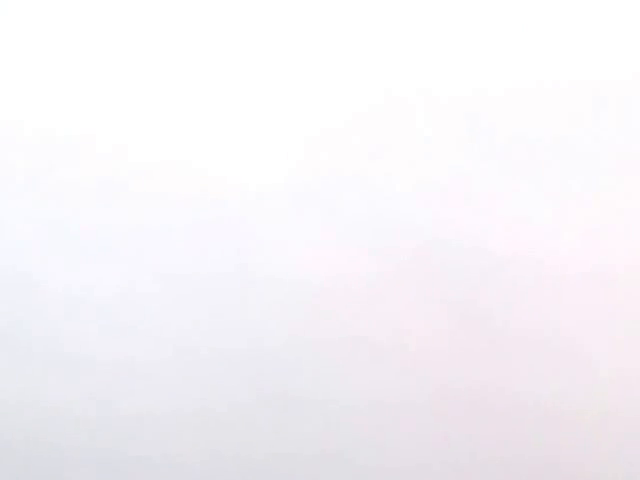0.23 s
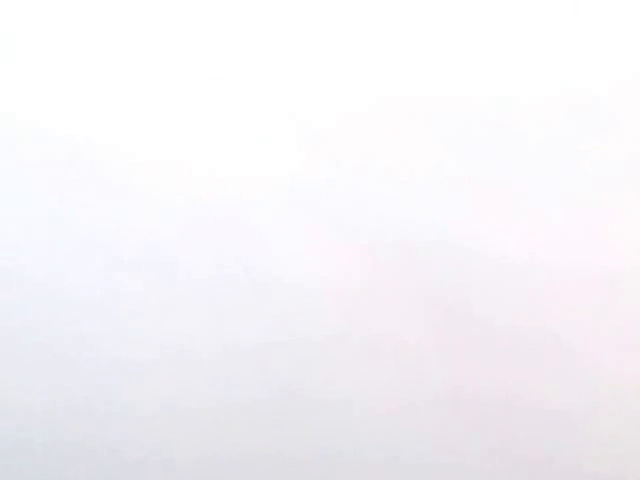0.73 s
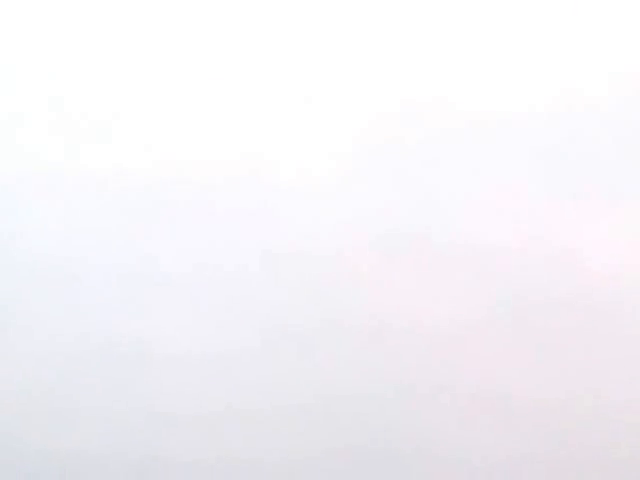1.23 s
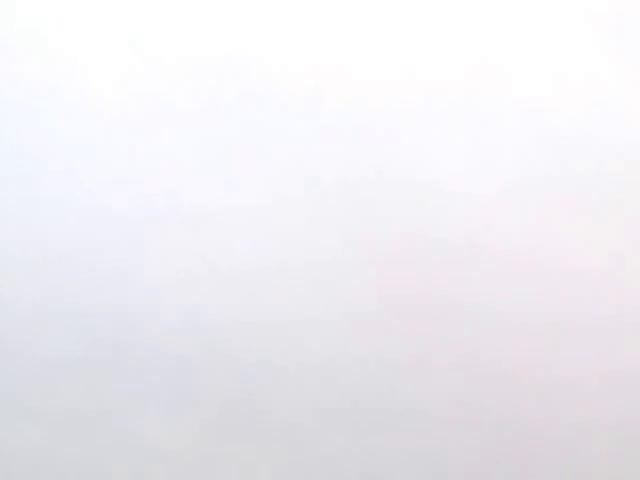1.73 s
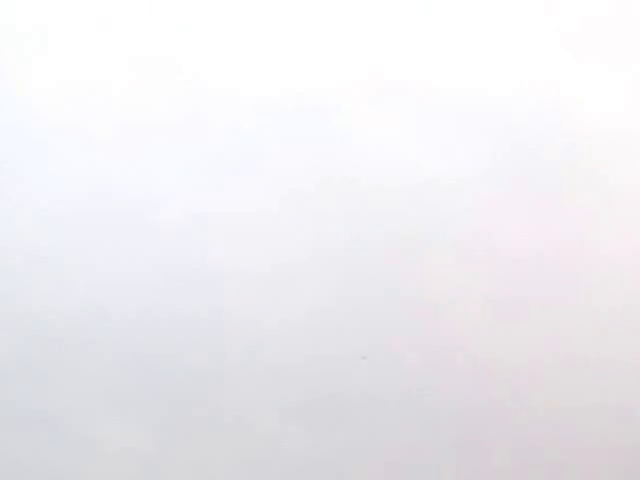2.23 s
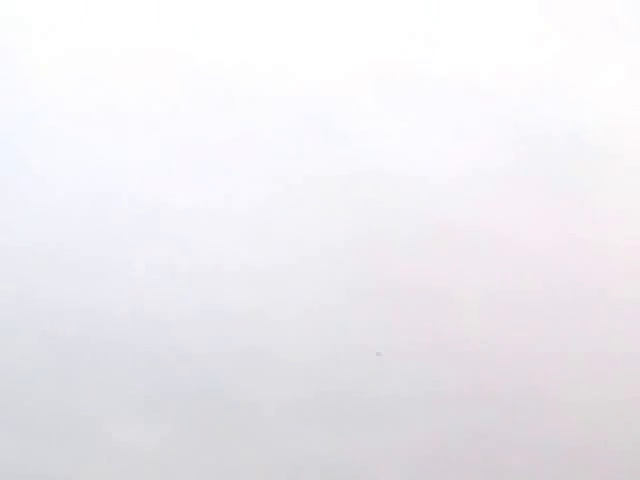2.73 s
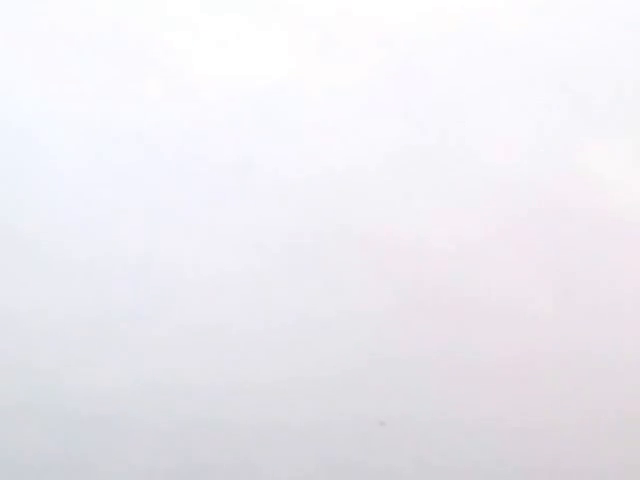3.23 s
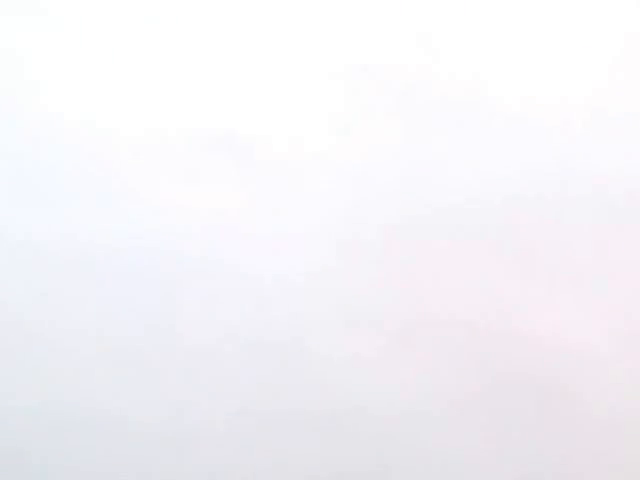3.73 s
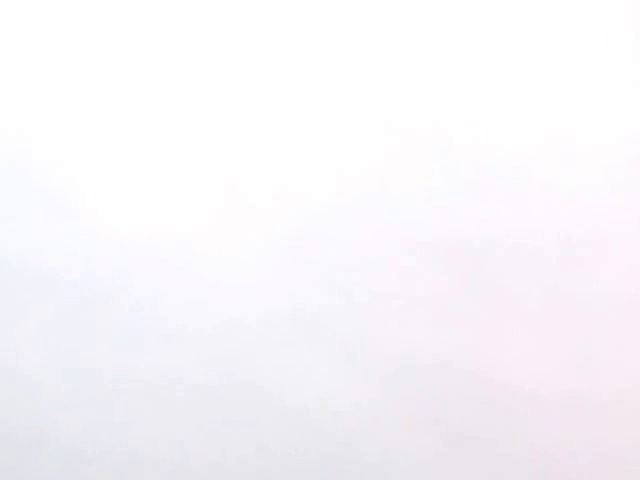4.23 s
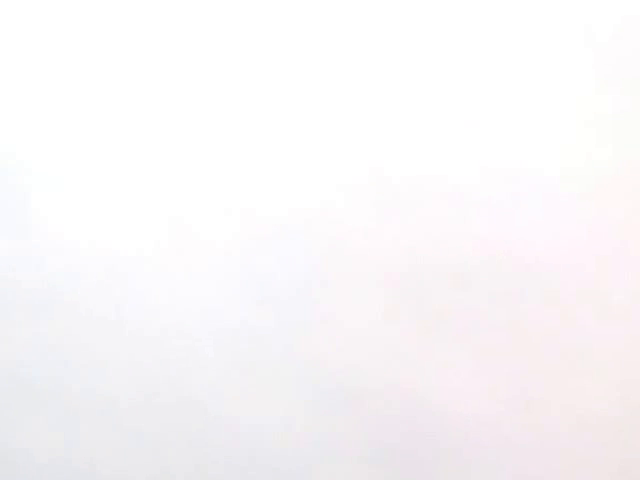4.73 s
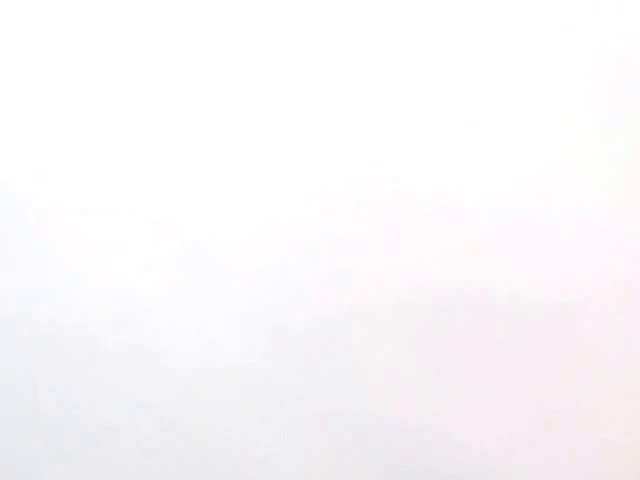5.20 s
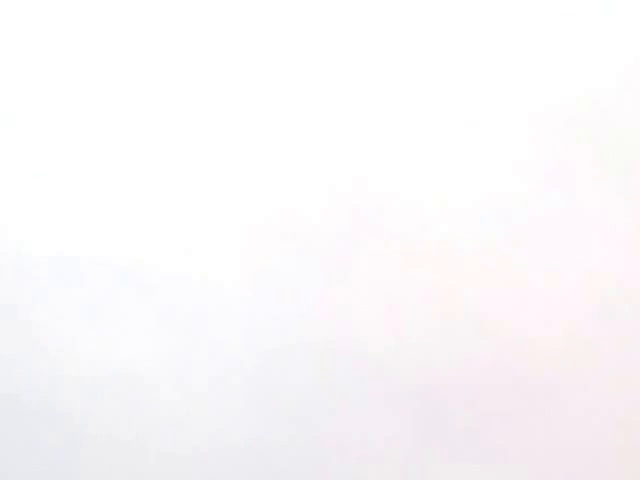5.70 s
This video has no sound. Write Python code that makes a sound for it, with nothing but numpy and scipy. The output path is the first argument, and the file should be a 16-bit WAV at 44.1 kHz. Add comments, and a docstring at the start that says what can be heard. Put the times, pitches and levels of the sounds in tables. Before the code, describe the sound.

Outdoors, a small electric model plane buzzes in the sky: its whine drops at the start, holds steady for several seconds, brightens and swells, surges up around four seconds, then falls lower. Wind rumbles and thumps on a handheld camera's microphone. Fingers rub and knock the casing, with loud hollow knocks near 1.6, 2.5 and 3.7 seconds. Very faint birds chirp early.

```python
"""Outdoors in open air, an electric model plane whines overhead: it throttles back, cruises,
surges once and falls in pitch. Blade overtones are summed sines, combed by a moving ground reflection.
Shaped noise makes the rush of air off the propeller, the outdoor bed and the wind rumble.
The speed controller whistles thinly, faint birds chirp as gliding sines, and eddies thump the microphone.
Fingers knock, rub and once squeak on the camera body: damped thuds, ticks, noise and a wavering tone."""
import sys
import numpy as np
from scipy import signal
from scipy.fft import rfft, irfft, next_fast_len
from scipy.io import wavfile

SR = 44100
rng = np.random.default_rng(int(sys.argv[2]) if len(sys.argv) > 2 else 0)


def file_out(sig):
    """Save sig as 16-bit WAV at sys.argv[1]."""
    # one column per channel
    cols = np.atleast_2d(sig).T
    # limit, then scale
    lim = np.clip(cols, -1, 1)
    pcm = np.round(lim * 32767).astype(np.int16)
    wavfile.write(sys.argv[1], SR, pcm)


N = 262836
TIME = np.arange(N) / SR

# flight of the plane; as it sinks, the ground reflection closes up on the direct sound, later opening a little:
# time_s, level_db before colouring, brightness_db_per_octave, reflection_delay_ms, reflection_gain (0-1)
FLIGHT_PATH = [(0, -48.5, -4.5, 1.4, 0.5), (.29, -50, -2.5, 0.96, 0.1), (.6, -51.5, -4, 0.97, 0.64),
               (.87, -45.5, 0.5, 1.033, 0.45), (1.2, -47.5, -1.5, 1.02, 0.58),
               (1.88, -48.5, -0.1, 0.87, .3), (2.17, -44.5, 2.5, 0.86, 0.33), (2.57, -49, 1.3, 0.79, 0.66),
               (2.93, -44.5, 0.8, 0.8, .55), (3.35, -41, 2.5, 0.65, 0.4), (3.72, -41.5, 2.5, 0.58, 0.6),
               (3.89, -41.5, 1.5, .4, .62), (4.13, -38, 3.5, 0.063, 0.56), (4.49, -37.5, 2, .17, 0.31),
               (4.71, -40.5, 0.7, 0.35, .7), (4.84, -46, -1, .42, 0.93), (5.22, -44.5, -1.5, 0.38, 0.44),
               (5.55, -42.5, 0, .31, 0.66), (5.75, -39.5, 0, 0.31, 0.56), (5.96, -40.5, .3, 0.27, 0.35)]


def amp(db):
    """Decibels to gain."""
    return 10 ** (np.asarray(db) / 20)


def evened(x):
    """Scales to unit rms."""
    return x / np.sqrt(np.mean(x ** 2) + 1e-20)


def curves(rows):
    """Each column of a table after the first, as a curve over time."""
    s, *columns = np.transpose(rows)
    return [np.interp(TIME, s, c) for c in columns]


def read(points, hz):
    """A spectrum in dB, joined by straight lines on a log-frequency axis."""
    f, db = np.transpose(points)
    return np.interp(np.log(hz + 1), np.log(f + 1), db)


def noise(colour):
    """Noise of unit rms with the given spectrum."""
    size = next_fast_len(N)
    spectrum = rfft(rng.standard_normal(size))
    gain = amp(read(colour, np.fft.rfftfreq(size, 1 / SR)))
    return evened(irfft(spectrum * gain, size)[:N])


def drift(rate_hz):
    """Slow random wandering of unit rms, up to about the given rate."""
    size, step = 2048, 256  # control points, and samples between them
    f = np.fft.rfftfreq(size, step / SR)
    slow = irfft(rfft(rng.standard_normal(size)) / (1 + (f / rate_hz) ** 2), size)
    return evened(np.interp(TIME, np.arange(size) * step / SR, slow))


def add(mix, s, sound):
    """Mixes a sound in at time s."""
    part = mix[round(s * SR):][:len(sound)]
    part += sound[:len(part)]


def propeller(jitter=0.0011, flutter_db=0.81, shimmer_db=1.47, shaft_db=-16):
    """Blade overtones, heard directly and once more off the ground, through restless air."""
    # blade-passing rate as heard: time_s, pitch_hz
    blade_rate = [(0.0, 362.7), (0.1, 354.6), (0.325, 310.4), (0.433, 305.4), (1.45, 303.8), (1.95, 305.4),
                  (2.75, 305.1), (3.779, 304.6), (4.047, 334), (4.194, 361.2), (4.321, 368.2),
                  (4.428, 366.5), (4.54, 320.3), (4.62, 303), (4.814, 280.1), (4.93, 274.7), (5.04, 273.3),
                  (5.206, 266), (5.689, 264), (5.96, 258.6)]
    # colour of the whine after its way through the air: frequency_hz, gain_db
    blade_tone = [(260.0, -13.5), (370.0, -5.5), (530.0, -1), (620.0, -7.5), (900.0, -1.8), (1400.0, -0.5),
                  (2000.0, -5), (2700.0, -11.5), (3200.0, -20.5), (4500.0, -33)]
    # the blades' own overtones, from the first up; the third is weak: gain_db
    overtones_db = [2.5, -2.2, -7.5, 1.8, 1.7, 1.5, 0.8, 1.7, 2.5, -1.7, -2, -12.5, -8.5]
    hz = curves(blade_rate)[0] * (1 + jitter * drift(rate_hz=37))
    level_db, tilt_db, delay_ms, bounce = curves(FLIGHT_PATH)
    phase = 2 * np.pi * np.cumsum(hz) / SR
    lag = 2 * np.pi * hz * delay_ms / 1000  # phase lost on the detour by the ground
    tilt_centre_hz = 1500
    overtones = np.zeros(N)
    for k, overtone_db in enumerate(overtones_db, 1):
        angle = k * phase + rng.normal(0, 0.35)  # nearly in step: each blade passage is a short pulse
        db = level_db + overtone_db + read(blade_tone, k * hz)
        db = db + tilt_db * np.log2(k * hz / tilt_centre_hz)
        tone = amp(db) * (np.cos(angle) + bounce * np.cos(angle - k * lag))
        # turbulence shakes high overtones most
        overtones += tone * amp(shimmer_db * np.sqrt(k / 5) * drift(rate_hz=4.3))
    # at low speed, two slightly unequal blades leave weak shaft tones between the overtones
    shaft = sum(np.cos((k + .5) * phase + rng.uniform(0, 2 * np.pi)) / k for k in range(1, 8))
    idling = np.clip((300 - hz) / 35, 0, 1)
    shaft_tones = amp(level_db + shaft_db) * idling * shaft
    # two blades: the shaft turns at half the blade-passing rate
    return amp(flutter_db * drift(rate_hz=27)) * (overtones + shaft_tones + braking(phase / 2))


def braking(shaft_phase):
    """Two close motor tones, the 13th and 14th shaft orders, swell and fade as the shaft slows."""
    # spells of throttling back: start_s, end_s, order_13_db, order_14_db
    slowdowns = [(-0.15, 0.285, -52, -49), (4.424, 4.57, -50, -44)]
    out = np.zeros(N)
    for start, end, low_db, high_db in slowdowns:
        progress = np.clip((TIME - start) / (end - start), 0, 1)
        swell = np.sqrt(abs(np.sin(np.pi * progress)))
        tones = amp(low_db) * np.cos(13 * shaft_phase) + amp(high_db) * np.cos(14 * shaft_phase)
        out += swell * tones
    return out


def rush(swirl_db=1.0, echo_share=0.13):
    """Turbulent air off the blades, with a weaker share of the same ground reflection."""
    # rush of air through the propeller: time_s, level_db
    rush_level = [(0, -53), (.5, -61), (1, -54.5), (1.5, -57.5), (1.9, -52.5), (2.2, -51), (2.55, -56),
                  (3, -50.5), (3.6, -50), (3.8, -50.5), (4.15, -46), (4.5, -46), (4.8, -48), (5.1, -48.5),
                  (5.6, -47), (5.96, -45.5)]
    # its colour: frequency_hz, gain_db
    rush_colour = [(100, -1), (190, -6.5), (300, -8), (550, -9.5), (800, -4.5), (1200, -4), (1700, 1),
                   (2500, 1.5), (3000, -3.5), (3600, -13.5), (4300, -20), (6500, -24), (10000, -30),
                   (16000, -33)]
    _, _, delay_ms, bounce = curves(FLIGHT_PATH)
    air = noise(rush_colour)
    echo = np.interp(TIME - delay_ms / 1000, TIME, air)
    level_db = curves(rush_level)[0] + swirl_db * drift(rate_hz=9.3)
    return evened(air + echo_share * bounce * echo) * amp(level_db)


def controller(whistle_hz=7810, waver_db=1.5, wobble_hz=5):
    """The motor windings sing thinly at the speed controller's switching rate."""
    # switching whistle: time_s, level_db
    whistle_level = [(0, -94), (.8, -83), (1.9, -101), (2.2, -77), (2.8, -84), (3.5, -80), (4.3, -93),
                     (4.85, -68.5), (5.3, -77), (5.6, -59), (5.67, -75), (5.75, -62.5), (5.96, -65)]
    phase = 2 * np.pi * np.cumsum(whistle_hz + wobble_hz * drift(rate_hz=12.6)) / SR
    return evened(np.sin(phase)) * amp(curves(whistle_level)[0] + waver_db * drift(rate_hz=33))


def knocks(body_hz=550, swell_s=0.0019, ring_hz=700, ring_db=-20, ring_t60=0.044, push_db=-17):
    """Each knock is a tick, then a low push and a heavily damped swell of the hollow body."""
    # knocks on the camera body: time_s, hollow_thud_gain_db, sharp_tick_peak_db
    knock_hits = [(0.3436, -26.5, -47), (1.5939, -1.5, -10.5), (1.668, -27.5, -54), (1.7022, -16, -14.5),
                  (1.7109, -29, -21.5), (1.836, -12, -0.5), (2.4735, -1.5, -13), (3.724, -1.5, -16)]
    # colour of the tick: frequency_hz, gain_db
    tick_colour = [(30, -2), (120, 4.5), (580, -4.5), (1100, 4), (1900, 7), (2500, -3.5), (3300, -8.5),
                   (4200, -15.5), (7300, -28.5), (9000, -23), (11000, -35), (16000, -43)]
    size = 4096
    t = np.arange(size) / SR
    # minimum phase packs the tick's energy at its onset
    log_gain = np.log(amp(read(tick_colour, abs(np.fft.fftfreq(size, 1 / SR)))))
    tick = np.fft.ifft(np.exp(signal.hilbert(log_gain).conj())).real
    # the casing smears the tick with an allpass at 1500 Hz: its treble arrives before its middle
    pole = .86 * np.exp(2j * np.pi * 1500 / SR)
    smear = np.poly([pole, pole.conjugate()]).real
    tick = signal.lfilter(smear[::-1], smear, tick)
    u = t / swell_s
    swell = (u * np.exp(1 - u)) ** 3.6
    ring = amp(ring_db - 60 * t / ring_t60) * (1 - np.exp(-u)) * np.sin(2 * np.pi * ring_hz * t)
    hollow = np.sin(2 * np.pi * body_hz * (t - swell_s) + 1)
    thud = ring - swell * (hollow + amp(push_db))
    out = np.zeros(N)
    for s, thud_db, tick_db in knock_hits:
        add(out, s, amp(thud_db) * thud + amp(tick_db) * tick / abs(tick).max())
    return out


def rubs(grip_db=1.5):
    """Skin drags unevenly over the casing, stirring its hollow and hissing."""
    # fingers sliding on the body: start_s, loudest_s, end_s, level_db, hiss_db relative to that level
    slides = [(0.073, 0.106, 0.17, -42.5, -37), (0.342, 0.35, .46, -39.5, -31),
              (1.685, 1.705, 1.72, -30, -24), (1.942, 1.946, 2.135, -42, -37), (2.16, 2.29, 2.4, -40, -44),
              (2.255, 2.347, 2.47, -28, -20), (2.361, 2.447, 2.487, -30.5, -10),
              (2.821, 2.897, 2.98, -41, -24)]
    # colour of the rubbing: frequency_hz, gain_db
    rub_colour = [(50, -20), (170, 0), (330, -12.5), (600, -1.5), (950, -12), (1400, -11), (1900, -8.5),
                  (2800, -18), (4000, -30.5), (6500, -47), (16000, -84)]
    # colour of the skin's hiss: frequency_hz, gain_db
    skin_colour = [(500, -36), (2500, -7), (4500, -3), (6500, -10), (9500, -6.5), (12000, -13.5),
                   (16000, -21)]
    body, skin, out = noise(rub_colour), noise(skin_colour), np.zeros(N)
    for start, loudest, end, db, hiss_db in slides:
        pressure = np.sin(np.pi / 2 * np.interp(TIME, [start, loudest, end], [0, 1, 0])) ** 2
        out += amp(db) * pressure * (body + amp(hiss_db) * skin)
    catching = drift(rate_hz=70)
    return out * amp(grip_db * catching)


def squeak(hz=540, squeak_db=-39, waver=0.037, rough_db=-4.0):
    """A fingertip's uneven stick and slip locks to the hollow of the casing in a brief low squeak."""
    # start_s, end_s
    start, end = (.375, .432)
    phase = 2 * np.pi * np.cumsum(hz * (1 + waver * drift(rate_hz=80))) / SR
    progress = np.clip((TIME - start) / (end - start), 0, 1)
    grip = np.sqrt(abs(np.sin(np.pi * progress)))
    return grip * np.sin(phase) * amp(squeak_db + rough_db * drift(rate_hz=42))


def wind(lump_db=2, gust_db=-17, gust_s=0.046):
    """A lumpy rumble that swells around each eddy; the eddy swings the pressure up and down once."""
    # rumble of the wind between gusts: time_s, level_db
    rumble_level = [(0, -41.5), (1.1, -44), (2.1, -42), (2.9, -38.5), (3.3, -45), (4.6, -42), (5.96, -44)]
    # its colour: frequency_hz, gain_db
    wind_colour = [(8, -58), (22, -0.5), (36, 3.5), (60, 0), (100, -10.5), (160, -21.5), (300, -29),
                   (800, -39.5), (3000, -79)]
    # single eddies that hit the microphone, and three low finger rubs near 3.35-3.55 s that thump the same way:
    # time_s, peak_db, half_length_ms
    buffets = [(0.166, -29, 5), (0.188, -22.5, 9.1), (0.38, -21, 7.1), (0.461, -25.5, 3.8),
               (0.548, -16, 4.3), (0.56, -29, 5.9), (0.892, -27.5, 5.3), (1.169, -30, 5.8),
               (1.244, -24.5, 5.8), (1.4, -24.5, 4), (1.423, -21, 4.4), (2.143, -31.5, 6.6),
               (2.711, -22, 3.6), (2.751, -22, 3.4), (2.908, -25, 6.2), (2.982, -24, 9.9),
               (3.351, -35, 4.2), (3.53, -38, 1.92), (3.547, -43, 1.7), (3.772, -28.5, 4.3),
               (3.794, -27, 6.5), (3.839, -18.5, 6.2), (5.092, -25, 4.6)]
    power, eddies = amp(curves(rumble_level)[0]) ** 2, np.zeros(N)
    for s, db, half_ms in buffets:
        u = (TIME - s) * 1000 / half_ms
        swing = -u / (1 + u * u) ** 2
        eddies += amp(db) * swing / swing.max()
        # the gust around the eddy is set relative to the eddy's peak
        power = power + amp(db + gust_db) ** 2 * np.exp(-((TIME - s) / gust_s) ** 2)
    return eddies + noise(wind_colour) * np.sqrt(power) * amp(lump_db * drift(rate_hz=4.8))


def birds(rasp_db=2, scatter_hz=200):
    """Faint far-off birds: thin gliding whistles, roughened by distance."""
    # start_s, end_s, first_hz, middle_hz, last_hz, level_db
    chirps = [(0.531, 0.629, 2550, 2400, 2100, -55), (1.195, 1.245, 4500, 4750, 4500, -68),
              (1.276, 1.389, 3700, 4500, 4460, -60.5), (1.28, 1.349, 4000, 3000, 2400, -61),
              (1.408, 1.49, 5200, 3700, 3140, -60.5)]
    out = np.zeros(N)
    for start, end, first_hz, middle_hz, last_hz, db in chirps:
        u = np.linspace(0, 1, round((end - start) * SR))
        glide = np.polyfit([0, .5, 1], [first_hz, middle_hz, last_hz], 2)
        hz = np.polyval(glide, u) + scatter_hz * drift(rate_hz=400)[:len(u)]
        whistle = np.sin(2 * np.pi * np.cumsum(hz) / SR)
        add(out, start, amp(db) * np.sin(np.pi * u) * whistle)
    return out * amp(rasp_db * drift(rate_hz=41))


def open_air():
    """Outdoor background and microphone hiss: one coloured noise whose level moves gently."""
    # time_s, level_db
    air_level = [(0, -52.5), (1.55, -52.5), (1.9, -55.5), (2.6, -54.5), (3.3, -55), (3.7, -51.5),
                 (3.8, -55.5), (4.4, -55), (5.96, -52)]
    # frequency_hz, gain_db
    air_colour = [(30, 12.5), (150, -7.5), (400, -7), (1000, -3), (2500, -10), (4500, -19.5), (8000, -24.5),
                  (12000, -26), (16000, -30)]
    return noise(air_colour) * amp(curves(air_level)[0])


def scene():
    """The plane, the noises right at the microphone, and the open air."""
    plane = propeller() + rush() + controller()
    fingers = knocks() + rubs() + squeak()
    background = wind() + birds() + open_air()
    return (plane + fingers + background)[None]


def record(dry, edge_hz=15900):
    """The camera's band limit: a steep lowpass."""
    lowpass = signal.firwin(511, edge_hz, window=("kaiser", 9), fs=SR)
    return signal.oaconvolve(dry, lowpass[None], "same")


dry = scene()
out = record(dry)
file_out(out)
```